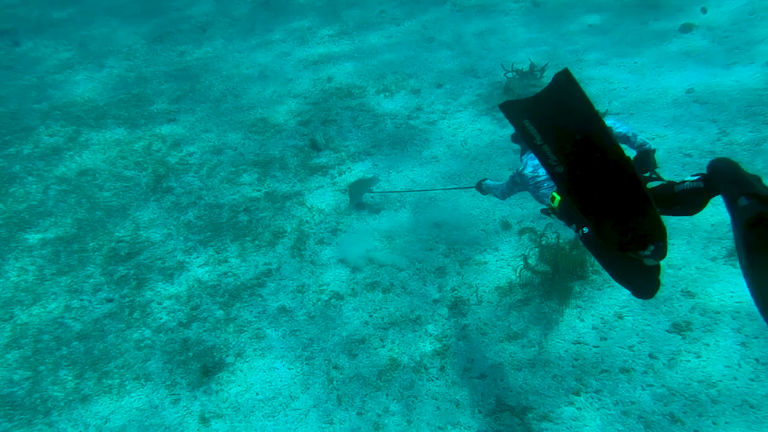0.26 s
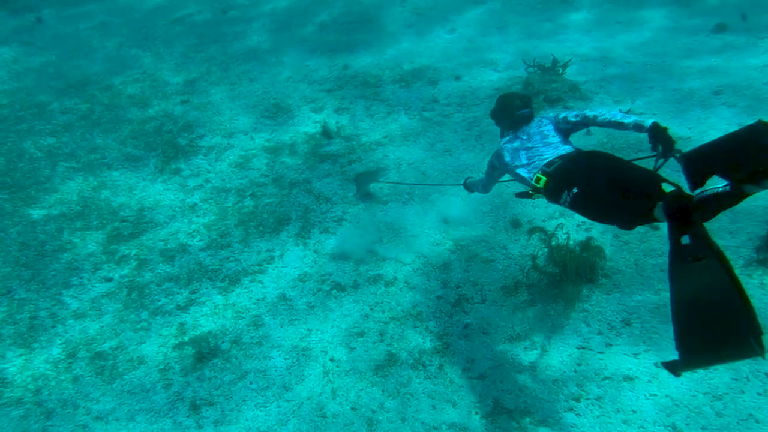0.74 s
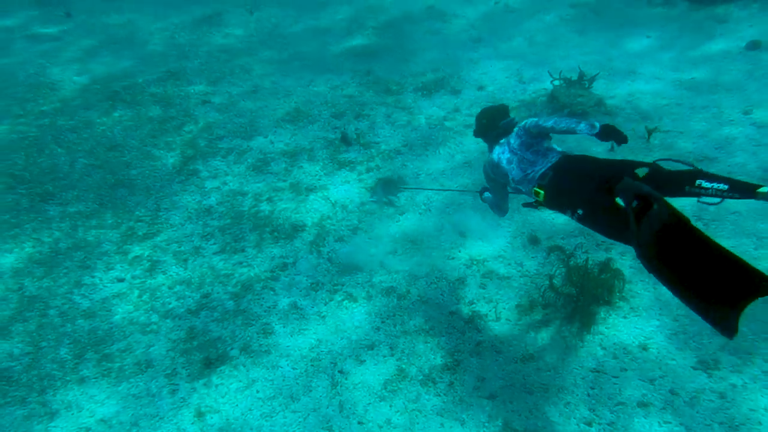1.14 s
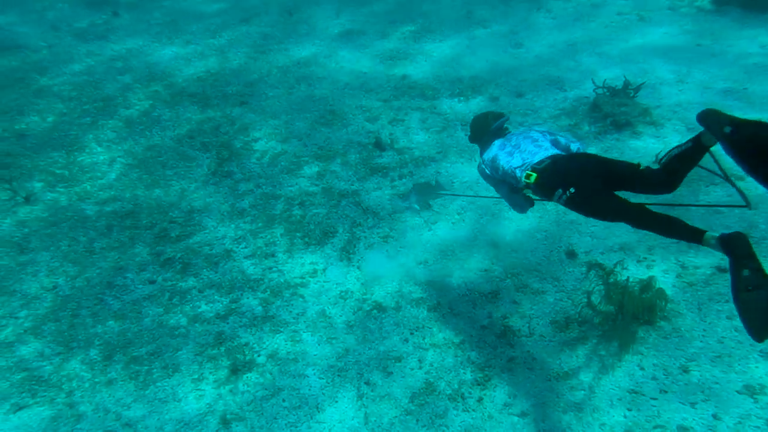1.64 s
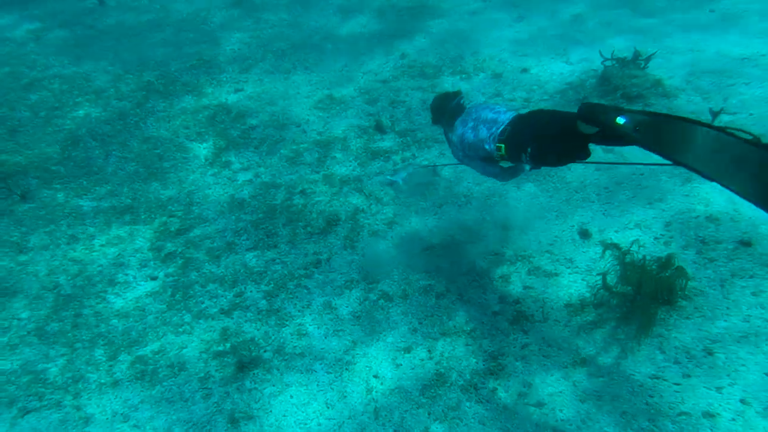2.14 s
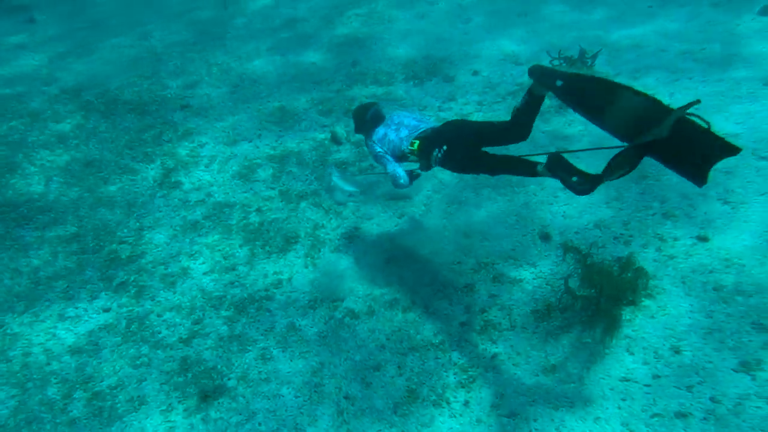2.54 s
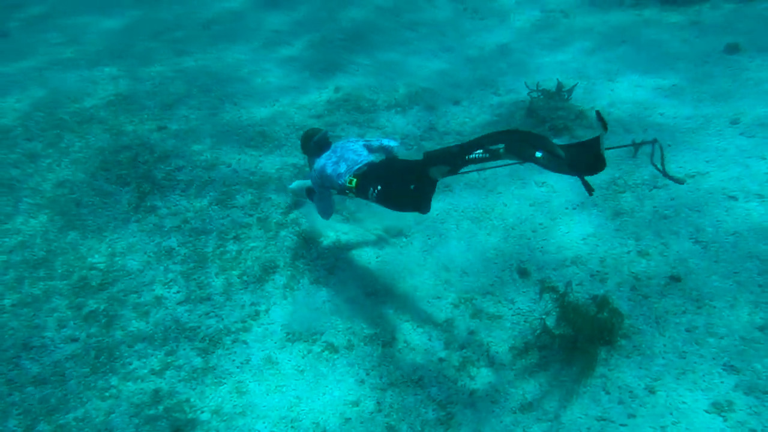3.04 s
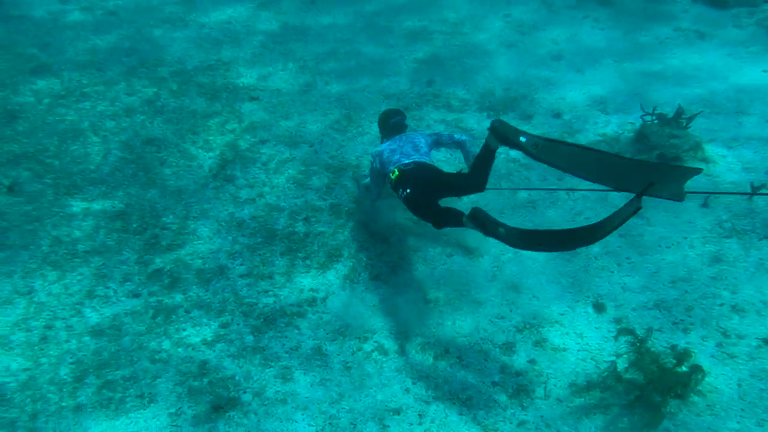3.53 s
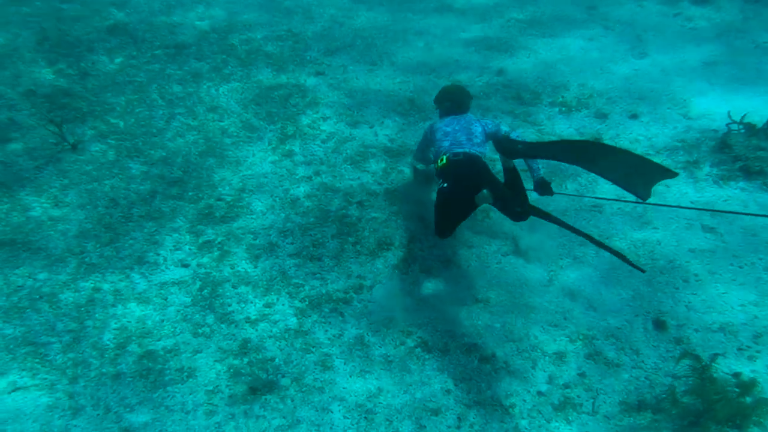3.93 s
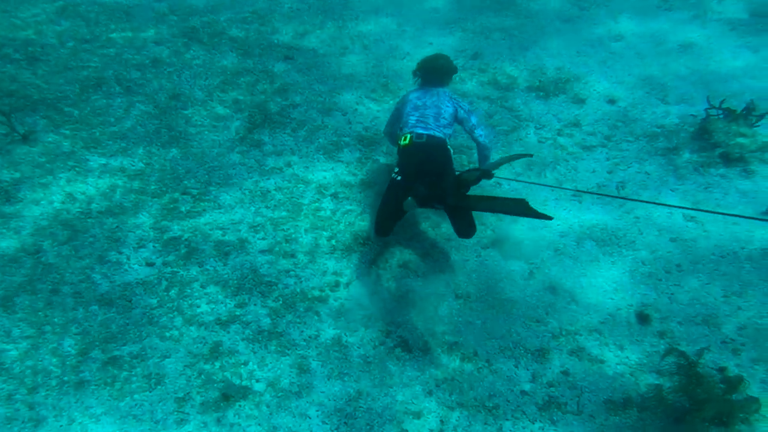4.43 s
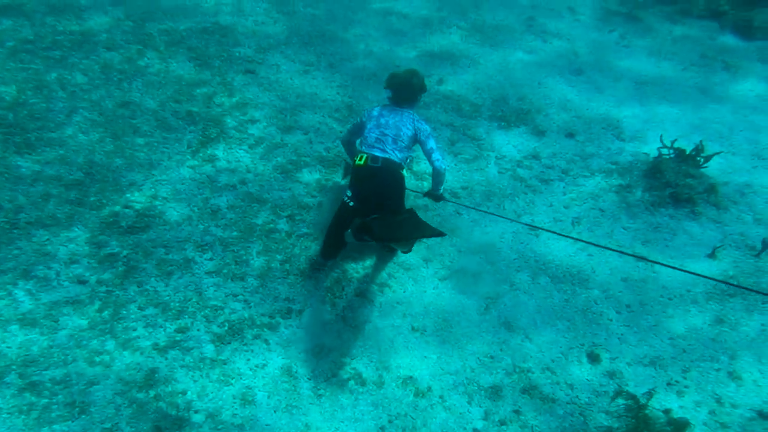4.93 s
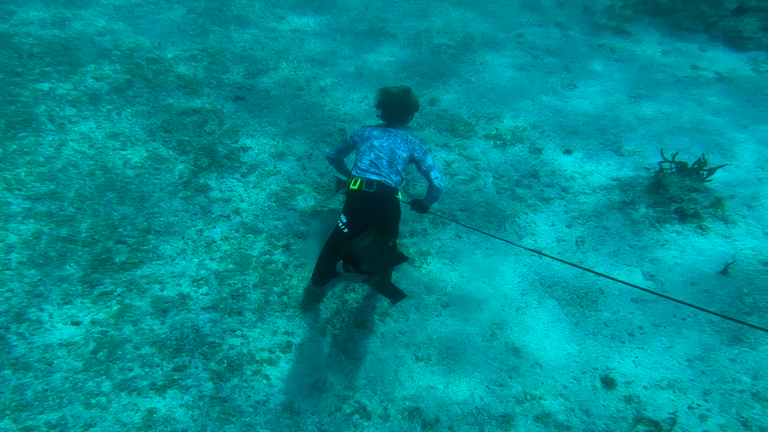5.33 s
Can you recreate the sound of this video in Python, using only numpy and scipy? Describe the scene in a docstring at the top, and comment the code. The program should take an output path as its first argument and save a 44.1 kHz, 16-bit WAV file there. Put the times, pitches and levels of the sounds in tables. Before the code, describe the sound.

Underwater ambience from a camera in a waterproof case over a shallow sandy bed where a diver swims. Dense distant shrimp crackle and irregular close snaps run throughout above a throbbing low rumble and faint slosh. Small bubbles blip hollowly inside the case. Heavy dull thuds land just after two seconds, then lighter knocks, a cluster near 4.4 seconds and more after 5, many on the right.

```python
"""Deep rumble of water and the crackle of shrimp run throughout, some shrimp snapping near, the rest far off.
Place: a shallow sea bed, with a camera in a waterproof case gliding over it. Noise bands make the rumble and slosh,
random clicks the far crackle, single clicks with echoes the near snaps. Small bubbles and trickles ring the air
inside the case; dull knocks, many on its right port, are a tick and a short falling tone.
Two microphones sit behind the ports; snaps, crackle, bubbles and trickles reach them through its resonances."""
import sys
import numpy as np
from scipy import signal
from scipy.fft import rfft, irfft, next_fast_len
from scipy.io import wavfile
from scipy.ndimage import map_coordinates

SR = 44100
rng = np.random.default_rng(int(sys.argv[2]) if len(sys.argv) > 2 else 0)


def output_pcm(signal):
    """Save a mono or channel-first signal as 16-bit PCM at the path in sys.argv[1].

    Samples are clipped to [-1, 1] before scaling.
    """
    pcm = np.clip(np.atleast_2d(signal).T, -1, 1) * 32767
    wavfile.write(sys.argv[1], SR, np.round(pcm).astype(np.int16))


N = 245637  # samples


def amp(db):
    """dB to gain."""
    return 10 ** (np.asarray(db) / 20)


def unit(x):
    """Scaled to rms 1."""
    return x / np.sqrt(np.mean(x ** 2) + 1e-20)


def along(points, hz):
    """(f/Hz, value) points read on a log frequency axis."""
    f, v = np.transpose(points)
    return np.interp(np.log(hz + 1), np.log(f + 1), v)


def curves(rows):
    """One value per sample for each column after t/s."""
    s, *cols = np.transpose(rows)
    return [np.interp(np.arange(N) / SR, s, c) for c in cols]


def wobble(rate):
    """A smooth random curve, rate knots a second."""
    knots = rng.standard_normal(int(N * rate / SR) + 4)
    return map_coordinates(knots, [np.arange(N) * rate / SR])


def filtered(x, response):
    """x times a complex response of an even FFT grid."""
    m = 2 * next_fast_len(N // 2 + 4096)
    return irfft(rfft(x, m) * response(np.fft.rfftfreq(m, 1 / SR)), m)[..., :N]


def band(hz, lo_hz, hi_hz):
    """A smooth band-pass gain."""
    return 1 / np.sqrt((1 + (lo_hz / (hz + 1)) ** 16) * (1 + (hz / hi_hz) ** 16))


# Resonances of the case at each microphone, before the air gap: f/Hz, level/dB
LEFT_PORT = [(150, 27.5), (400, -21.5), (680, 0), (820, -3.5), (1150, -24.5), (1700, -23), (2500, -22.5),
             (2900, -19), (3300, -30.5), (4050, -27.5), (4800, -20), (5800, -16), (6300, -19), (6900, -25)]
RIGHT_PORT = [(150, -20.5), (520, -12), (780, 2), (1150, -24.5), (1400, -24.5), (1630, -10.5), (2100, -26),
              (2400, -17.5), (3000, -23.5), (3300, -16.5), (4100, -26.5), (5400, -18), (5800, -10.5),
              (6900, -21)]
# Treble loss from water to the air before the microphones: f/Hz, level/dB
AIR_GAP = [(6900, -1), (7300, -10.5), (9000, -23), (10000, -28), (11500, -30), (12700, -36.5)]
# Phase by which the left port leads the right: f/Hz, lead/rad
LEFT_LEAD = [(20, -.2), (470, -.1), (780, -3.1), (1000, -3.4), (1150, -4), (1320, -5.7), (1500, -4.9),
             (2000, -5.2), (2200, -6.8), (2700, -6.7), (3050, -3.6), (3400, -6.2), (4200, -9.4),
             (4750, -9.4), (5500, -2.9), (7300, 0)]


def case(hz):
    """Two port responses: the right has minimum phase, the left takes that phase plus its lead."""
    size = amp([along(port, hz) + along(AIR_GAP, hz) for port in (LEFT_PORT, RIGHT_PORT)])
    # folding the cepstrum makes the right response causal
    cepstrum = irfft(np.log(size[1]))
    cepstrum[1:len(hz) - 1] *= 2
    cepstrum[len(hz):] = 0
    right_phase = rfft(cepstrum).imag
    return size * np.exp(1j * (right_phase + [along(LEFT_LEAD, hz), 0 * hz]))


# Likeness of scattered sound at the two ports: f/Hz, likeness (0 to 1)
LIKENESS = [(100, .5), (400, .2), (650, .93), (850, .995), (1000, .95), (1370, .35), (1550, .82),
            (2400, .9), (3000, .4), (3200, .62), (4100, .3), (4500, .87), (5300, .35), (6400, .7),
            (7200, .25)]


def scattered(common, own):
    """Sound from all sides: the left port shares only part of what the right port gets."""
    alike = lambda hz: np.clip(along(LIKENESS, hz), 0, 1)
    left = filtered(common, alike) + filtered(own, lambda hz: np.sqrt(1 - alike(hz) ** 2))
    return np.array([left, common])


def crackle(rate, spread_db, hiss):
    """Random clicks, rate a second, of random size spread by spread_db, over a steady hiss."""
    chance, size = rng.random((2, N))
    size_db = -spread_db * np.log(size + 0.0017)
    clicks = (chance < rate / SR) * amp(size_db) * rng.standard_normal((2, N))
    common, own = unit(clicks) + hiss * rng.standard_normal((2, N))
    return scattered(common, own)


def bursts(s, hz, cycles, gains, rise, fall):
    """Short tones around their peak times, rising for a share of their length; fall sinks their pitch."""
    out, t = np.zeros((2, N + SR)), np.arange(-SR // 10, SR // 10) / SR
    for k in range(len(s)):
        u = t * hz[k] / max(cycles[k], .3)
        swell = np.where(u < 0, np.exp(-(u / rise) ** 2), np.exp(-(u / (1 - rise)) ** 2))
        tone = swell * np.sin(2 * np.pi * hz[k] * t * (1 - fall[k] * np.tanh(u)) + 0.15)
        tone -= swell * tone.sum() / swell.sum()  # no net push
        out[:, round(s[k] * SR):][:, :len(t)] += np.outer(gains[:, k], tone)
    return out[:, SR // 10:][:, :N]


STIR_DB, STIR_T60 = -19, 0.36  # stirred slosh against its knock (dB); its decay time (s)


def stirring():
    """Gain of the slosh that each sharper knock on the whole case leaves behind, dying away."""
    t = np.arange(N) / SR
    power = 0
    for s, left_db, right_db, hz, _ in KNOCKS:
        if hz > 100:
            level_db = min(left_db, right_db) + STIR_DB - 60 * abs(t - s) / STIR_T60
            power = power + (t > s) * amp(2 * level_db)
    return np.sqrt(power)


# Rumble of water past the case, before chance swells and port balance: t/s, level/dB
RUMBLE_LEVEL = [(0, -35), (.2, -43), (.3, -36), (.5, -29), (.66, -39.5), (.74, -32), (.8, -44.5),
                (.86, -28.5), (.93, -42.5), (1.05, -38), (1.2, -32.5), (1.4, -35), (1.47, -24.5),
                (1.55, -48.5), (1.63, -29.5), (1.75, -48.5), (1.86, -33.5), (2, -35.5), (2.08, -24),
                (2.45, -35), (2.55, -43), (2.88, -45.5), (3.04, -35), (3.13, -50), (3.3, -34), (3.9, -35),
                (4.13, -40.5), (4.47, -31.5), (4.98, -30.5), (5.19, -49), (5.28, -26), (5.37, -43),
                (5.5, -33.5), (5.57, -34.5)]
# Slosh between knocks, before its swells: t/s, level/dB
SLOSH_LEVEL = [(0, -56), (.6, -60), (1.35, -57), (1.85, -51), (2.4, -55), (2.8, -60.5), (3.7, -50.5),
               (4.1, -57.5), (4.8, -52), (5.57, -52.5)]
# Spectra of rumble and slosh, as shape only: f/Hz, level/dB (per Hz)
RUMBLE_SPECTRUM = [(7.1, -31), (12, 3.5), (38, 5), (63, -5), (86, -18.5), (130, -21.5), (170, -42),
                   (290, -120)]
SLOSH_SPECTRUM = [(41, -35.5), (70, -8.5), (100, -13.5), (154, -10), (317, -26), (466, -19.5), (600, -45.5),
                  (780, -39), (1320, -120)]
THROB_DB = 1  # size of the rumble's chance swells (dB)
SLOSH_FOLLOWS = 0.25  # share of the rumble's level curve that the slosh takes on


def flow():
    """Water past the case: deep noise nearly alike at both ports, slightly stronger at the right, and a slosh."""
    rumble_db = curves(RUMBLE_LEVEL)[0]
    slosh_db = curves(SLOSH_LEVEL)[0] + SLOSH_FOLLOWS * (rumble_db - rumble_db.mean())
    slosh_db += 0.83 * wobble(5.29)
    a, b, c, d = rng.standard_normal((4, N))
    deep_noise = np.array([a + 0.13 * b, a - 0.27 * b])
    deep = unit(filtered(deep_noise, lambda hz: amp(along(RUMBLE_SPECTRUM, hz))))
    # a fairly even throb: the level curve sets most of its swells
    deep = unit(deep / (abs(signal.hilbert(deep[0])) + .5) ** 0.25)
    balance_db = [[-.8], [.8]]  # left, right
    rumble = amp(rumble_db + THROB_DB * wobble(8)) * deep * amp(balance_db)
    lumps = amp(3.8 * np.array([wobble(22), wobble(22.01)]) + 0.5 * wobble(7.1))
    slosh_noise = np.array([c + 0.58 * d, c - 0.37 * d])
    slosh = unit(lumps * filtered(slosh_noise, lambda hz: amp(along(SLOSH_SPECTRUM, hz))))
    return rumble + (amp(slosh_db) + stirring()) * slosh


# Far shrimp, before each band's offset and swells: t/s, level/dB
REEF = [(0, -53), (.5, -52.5), (1.1, -52.5), (1.9, -52), (2.05, -52.5), (2.55, -56), (2.78, -54),
        (2.9, -53), (3.5, -52.5), (4.15, -53.5), (4.45, -52.5), (5, -53), (5.45, -54), (5.57, -50)]
# Colour bands of near and far shrimp: from f/Hz, to f/Hz
COLOUR_BANDS = [(1200, 2270), (2140, 4570), (3800, 7150), (7100, 9100), (9400, 13000)]
# dull part of the far crackle before band offsets: start (dB), slow gain (dB/s), share of the trickle's swells
DULL_DB, DULL_DB_PER_S, DULL_FOLLOWS = -5, 0.88, 0.14


def far_crackle():
    """Shrimp at a distance: dense random clicks and hiss, swelling by chance in each colour band."""
    level_db = curves(REEF)[0]
    trickle_db = curves(TRICKLE)[0]
    dull_db = DULL_DB + DULL_DB_PER_S * np.arange(N) / SR
    dull_db += DULL_FOLLOWS * (trickle_db - trickle_db.mean())
    # for each band: offset/dB, hiss share, swells/dB
    settings = ((dull_db + 33.5, 1.6, 2.0), (0.99 * dull_db + 31.0, 1.32, 2.7),
                (27.36, 0.82, 1.35), (25.8, 1.6, 3.6), (25.6, 1.6, 3.4))
    out = np.zeros((2, N))
    for (lo_hz, hi_hz), (offset_db, hiss, swell_db) in zip(COLOUR_BANDS, settings):
        heard = lambda hz: case(hz) * band(hz, lo_hz, hi_hz)
        swells = amp(swell_db * (wobble(16) + 0.1 * wobble(9.9)))
        far = crackle(rate=500, spread_db=3.5, hiss=hiss) * swells
        out += filtered(unit(far) * amp(level_db + offset_db), heard)
    return out


# Trickling water, before chance swells: t/s, level/dB
TRICKLE = [(0, -51.5), (.11, -49.5), (.55, -49.5), (.8, -53), (.99, -42.5), (1.1, -49.5), (1.55, -49.5),
           (1.8, -48), (1.98, -45), (2.2, -42), (2.24, -53.5), (2.6, -51), (3.4, -50.5), (3.75, -47.5),
           (4.3, -49.5), (4.4, -46), (4.51, -51.5), (4.62, -45), (4.74, -43.5), (4.9, -48.5), (5.28, -47),
           (5.5, -49.5), (5.57, -34.5)]
# Bubbles, levels before the ports shape them: peak t/s, level/dB, pitch f/Hz, length/cycles
BUBBLES = [(0.267, -35, 1654, 12), (0.357, -38.5, 613, 11.6), (0.375, -36.5, 786, 9.3),
           (0.431, -40, 1630, 18), (0.54, -42, 1605, 17), (0.556, -35, 833, 13), (0.906, -36, 806, 3.7),
           (0.943, -33.5, 826, 9.3), (0.991, -48, 810, 7.5), (1.131, -31.5, 746, 5.4),
           (1.408, -30, 756, 11), (1.456, -29, 764, 4.7), (1.992, -30, 700, 6.6), (2.013, -29.5, 690, 6.6),
           (2.077, -30.5, 660, 7.3), (2.105, -38, 784, 7.6), (2.126, -24.5, 780, 4.4),
           (2.183, -38, 854, 7.8), (2.464, -34, 670, 3.5), (2.718, -36, 760, 5.2), (2.777, -32, 790, 2.6),
           (3.176, -31, 1670, 19), (3.423, -37.5, 1750, 17), (3.593, -33, 694, 11.3),
           (3.857, -33.5, 701, 5.7), (3.944, -31.5, 747, 7.4), (4.381, -26, 620, 3.4),
           (4.396, -36, 1720, 14), (4.641, -42, 1520, 13), (4.658, -40, 1430, 14), (4.67, -37, 513, 1.4),
           (4.733, -22.5, 670, 2.1), (4.739, -34, 1590, 14), (4.856, -45, 1620, 5.5), (4.871, -42, 1620, 9),
           (4.971, -37, 1610, 4.4), (5.344, -34, 683, 12), (5.362, -37, 710, 9.5), (5.5, -25.5, 500, 1.1)]


def bubbles():
    """Small bubbles and trickling water ring the air space in the case; the ports move against each other."""
    s, db, hz, cycles = np.transpose(BUBBLES)
    low = lambda f: case(f) * band(f, 305, 1430)
    trickle = unit(filtered(crackle(rate=500, spread_db=-0.5, hiss=0.52), low))
    trickle = trickle * amp(curves(TRICKLE)[0] + 1.22 * wobble(25))
    pops = bursts(s, hz, cycles, amp([db, db]), rise=0.18, fall=0 * hz)

    def shared(f):
        """Level against the louder port, time against the right one."""
        ports = case(f)
        return ports / abs(ports).max(axis=0) * np.exp(-1j * np.angle(ports[1]))

    return trickle + filtered(pops, shared)


def snap(t60, bounce):
    """One snap at both ports: the click amid scatter from sea bed and gear, a bounce off the surface."""
    t = np.arange(900) / SR
    out = 0.076 * rng.standard_normal((2, len(t))) * amp(-60 * t / t60)
    out[:, 24] = 1
    out[:, 24 + round(bounce * SR)] = -.4 * amp(rng.normal(0, 3.7))
    return out


# Near snaps: t/s, peak level/dB, then level/dB against that peak of 2.3-4.3 kHz, of 1.2-2.3 kHz
# and of 9-12 kHz (before the band offsets), left minus right level/dB
SNAPS = [(0.0307, -37, -2, -5.5, -37, -7), (0.115, -43.5, 1, -8, -35, -11),
         (0.2666, -42.5, 4.5, -2, -52, -13), (0.359, -42, -16, -17, -45, -3.5),
         (0.3877, -36.5, -1.5, -14, -51, -5), (0.4252, -41, -24, -3, -47, -10),
         (0.445, -36, -11, -17, -47, -4), (0.5167, -37.5, -27, -21, -29, 2), (0.5339, -49, -19, 7, -51, -5),
         (0.6392, -32.5, -21, -20, -38, -9), (0.9078, -36, -11, -10, -48, -1),
         (0.9562, -41, -27, -35, -47, 4), (1.029, -33, -9, -17, -38, -6), (1.0957, -32, -18, -16, -25.5, 1),
         (1.1324, -34, -7, -30, -30, -9), (1.2044, -35.5, -16, -9, -49, -7),
         (1.2587, -36.5, -34, -15, -49, -11), (1.285, -33.5, -36, -23, -45, 1),
         (1.4037, -39, -12, -16, -52, -7), (1.4735, -37.5, -24, -33, -47, -11),
         (1.5374, -34, -13, -17, -47, -9), (1.587, -34, -2.5, -28, -39, -7),
         (1.8073, -23.5, -31, -22, -38, -9), (1.8436, -33.5, -1, -30, -42, -12),
         (1.8763, -35.5, 0, -14, -48, -12), (1.9026, -28.5, -15, -6.5, -44, -5.5),
         (2.0727, -33.5, -16.5, -3.5, -53, -4.5), (2.1178, -39.5, 0, -1.5, -47, -2.5),
         (2.2098, -37, -11, -33, -31, -5), (2.263, -39, -25, -22, -35.5, -6),
         (2.278, -37, -3.5, -12, -37, -9), (2.3917, -41, -4, -3, -51, -7),
         (2.4077, -32.5, -5, -14, -69, -6.5), (2.42, -45.5, 0, 3, -54, -10.5),
         (2.4625, -28.5, -6.5, -17.5, -64, -5), (2.6955, -35.5, -11, -12, -52, -9),
         (2.7288, -31, -15, -17, -48, -8), (2.7571, -33.5, 2.5, -8, -26, -7.5),
         (2.7853, -34, -3.5, -13, -36.5, -10), (2.924, -36, -23, -28, -52, -5.0),
         (2.9615, -37, -3, -2, -54, -4), (3.0005, -44.5, 7, 5.5, -51, -8),
         (3.1705, -51.5, -1, 8.5, -58, -35.5), (3.2338, -35, -2.5, -6, -48, -5),
         (3.3143, -29, -10, -7.5, -42, -9), (3.3775, -33.5, -1.5, -27, -56, -11),
         (3.4211, -38, -5, -0.5, -43, -6), (3.4938, -26, -24, -34, -37.5, -11.5),
         (3.6876, -42.5, 2, -1, -50, -8), (3.716, -39, -20, -13, -47, -9),
         (3.7617, -31.5, -3, -20, -51, -4.5), (3.8222, -34, -11, -18, -46, -4),
         (3.905, -32, -14, -26.5, -35, -13), (4.0259, -44, 4.5, 5.5, -44, -4),
         (4.15, -28, -15, -28, -61, 3), (4.1828, -40.5, -3, -4, -53, 2), (4.2339, -43.5, 8, -1, -53, -6),
         (4.2588, -36.5, -9, -10, -52, -13), (4.329, -21, -14.5, -23, -59, -8.5),
         (4.336, -27, -7, -23, -69, -8.5), (4.376, -44, 8.5, -21, -59, -8.5),
         (4.3951, -32, -4.5, -20, -63, -8), (4.438, -33, -18, -20, -43, -7),
         (4.6152, -31, -24, -9, -38, -10), (4.627, -40, 7.5, 0.5, -51, -9), (4.667, -41, 3, 3, -52, -7),
         (4.731, -42.5, 4, 1, -50, -9), (4.801, -42, 6, -18, -50, -10), (4.8325, -52, 12.5, -12, -50, -8),
         (4.842, -44.5, -4, 2.5, -49, -18), (4.8688, -34, -16, -17, -61, -20),
         (4.9505, -26, -3.5, -28, -61, -8), (5.135, -39, -18, -7, -52, -10),
         (5.2882, -39.5, -6, -30, -39, -12), (5.458, -27.5, -34, -39, -49, -10),
         (5.4988, -49, 8, 9.5, -48, -14), (5.528, -44, 0, 1, -56, -20)]


def near_snaps():
    """Shrimp close by: each snap is a click with its own colour and a rattle of echoes, through the case."""
    s, db, mid_db, low_db, top_db, pan_db = np.transpose(SNAPS)
    bounce = rng.uniform(0.0055, 0.0099, len(s))  # delay of the surface echo (s)
    # the bright band gets the power that the duller bands leave
    bright_db = 10 * np.log10(np.clip(1 - amp(2 * mid_db) - amp(2 * low_db), .12, 1))
    # for each band: level/dB of every snap, echo t60/s
    settings = ((low_db, 0.043), (mid_db, 0.06), (bright_db, 0.014),
                (.5 * top_db - 11.5, 0.048), (top_db + 10.5, 0.021))
    out = np.zeros((2, N))
    for (lo_hz, hi_hz), (rel_db, t60) in zip(COLOUR_BANDS, settings):
        heard = lambda hz: case(hz) * band(hz, lo_hz, hi_hz)
        ring = filtered(np.arange(N) == 500, heard)[:, :2000]  # one click, to set its peak to 1
        blows = np.zeros((2, N + SR))
        for k in range(len(s)):
            click = snap(t60, bounce[k])
            sides = amp((db + rel_db)[k] + np.array([[.5], [-.5]]) * pan_db[k])
            blows[:, round(s[k] * SR):][:, :click.shape[1]] += sides * click
        out += filtered(blows[:, :N], heard) / abs(ring).max(axis=1, keepdims=True)
    return out


# Knocks on the case: peak t/s, left level/dB, right level/dB, pitch at the peak f/Hz, length/cycles
KNOCKS = [(0.243, -47, -67, 170, 3.4), (0.72, -57, -36.5, 194, 2), (1.64, -60, -33.5, 188, 1.7),
          (1.981, -32.5, -52, 147, 1.8), (2.028, -24.5, -18, 122, 1.7), (2.034, -13, -8.5, 58.8, 2.03),
          (2.074, -18, -16.5, 53.1, 3.3), (2.105, -31, -27, 110, 2.3), (2.143, -26, -22, 61.4, 3.7),
          (2.176, -54, -20, 145.5, 0.57), (2.193, -12, -7.5, 53, 1.75), (2.234, -35, -25.5, 58.2, 3.2),
          (2.4, -19.5, -21, 130, 1.25), (2.486, -66, -36, 160, 1.4), (2.668, -58, -27, 167, 0.51),
          (3.001, -21, -23, 155, 0.89), (3.011, -33, -26, 128, 1), (3.222, -51, -27.5, 173, 1.2),
          (3.233, -38, -25, 203, 0.5), (3.469, -62, -32.5, 185, 3.4), (4.309, -28, -31, 210, 0.5),
          (4.381, -20.5, -22.5, 172, .97), (4.387, -26.5, -31, 145, 1.2), (4.396, -23, -31, 168, 0.55),
          (4.412, -28.5, -31.5, 225, 4.2), (4.752, -45, -35, 179, 1.7), (5.065, -42, -17, 157, 1.55),
          (5.065, -31, -18.5, 66, 2.4), (5.126, -44, -30.5, 188, 2.9), (5.145, -59, -19, 124, 1.04),
          (5.154, -36, -29.5, 198, 0.74), (5.162, -46, -19.5, 170, 1.3), (5.242, -31.5, -35, 237, 1.2),
          (5.324, -39.5, -43.5, 288, 8.4), (5.414, -49, -46, 200, 0.87), (5.483, -28, -32, 209, 0.63),
          (5.502, -28, -30, 214, 1.6), (5.548, -50, -18, 176, 1.1), (5.564, -25, -40, 202, 1.8)]
# tick against the push: base (dB) at 170 Hz, more for higher and shorter knocks, more when the right port is hit
TICK_DB, TICK_DB_PER_OCTAVE, TICK_DB_PER_CYCLE, PORT_HIT_DB = -24, 6.5, -2.5, 19.5


def knocks():
    """Each knock starts with a sudden tick, then pushes the membranes in a short tone of sinking pitch."""
    s, left_db, right_db, hz, cycles = np.transpose(KNOCKS)
    port_hit = right_db - left_db > 12  # much louder at the right port
    tick_db = TICK_DB + TICK_DB_PER_OCTAVE * np.log2(hz / 170)
    tick_db += TICK_DB_PER_CYCLE * cycles + PORT_HIT_DB * port_hit
    gains = amp([left_db, right_db])
    blows = np.zeros((2, N))
    blows[:, np.round((s - .3 / hz) * SR).astype(int)] = -gains * amp(tick_db)
    u = np.arange(600) / SR / 0.0006
    tick = 3.9 * u * (1 - .5 * u) * np.exp(-u)  # a quick dent that springs back
    ticks = signal.fftconvolve(blows, tick[None], axes=1)[:, :N]
    pushes = bursts(s, hz, cycles, gains, rise=0.27, fall=0.32 * np.clip(hz / 150, 0, 1) ** 2)
    return pushes + ticks


def scene():
    """All sources at the two ports."""
    return flow() + far_crackle() + bubbles() + near_snaps() + knocks()


TOP_HZ = 12850  # band limit of the camera


def record(dry):
    """The camera keeps nothing above its band limit."""
    return filtered(dry, lambda hz: hz < TOP_HZ)


dry = scene()
out = record(dry)
output_pcm(out)
```